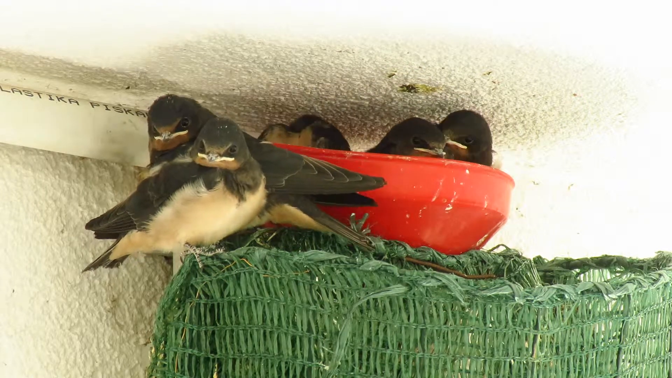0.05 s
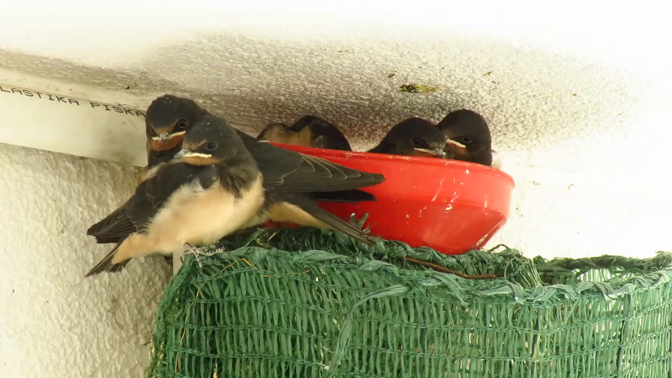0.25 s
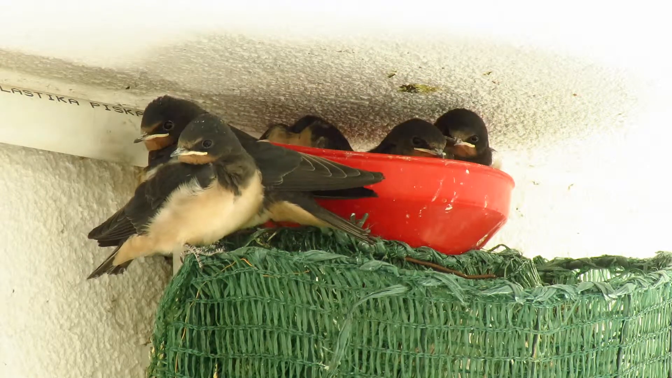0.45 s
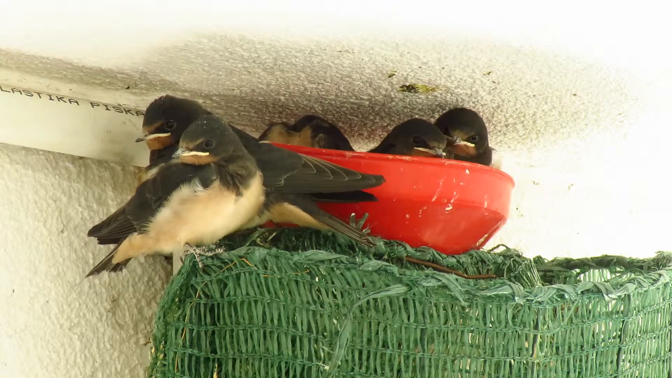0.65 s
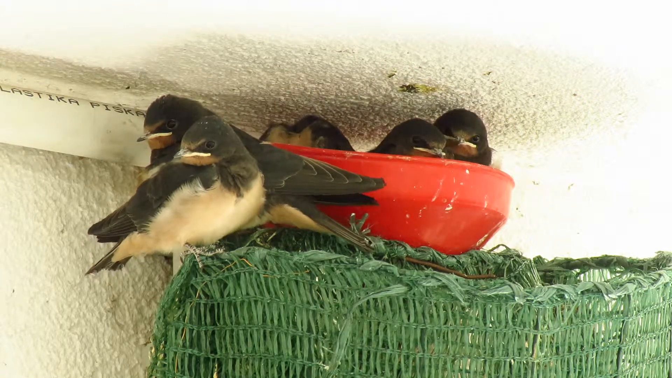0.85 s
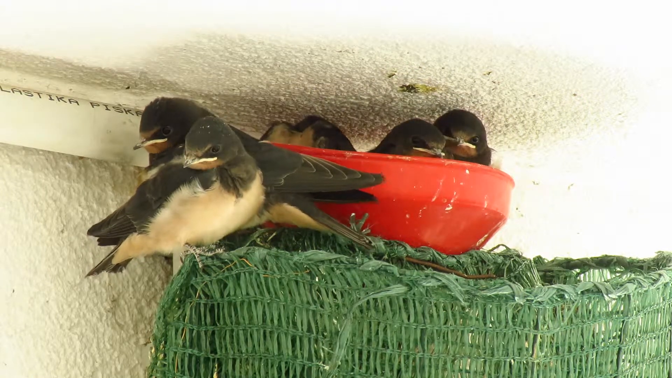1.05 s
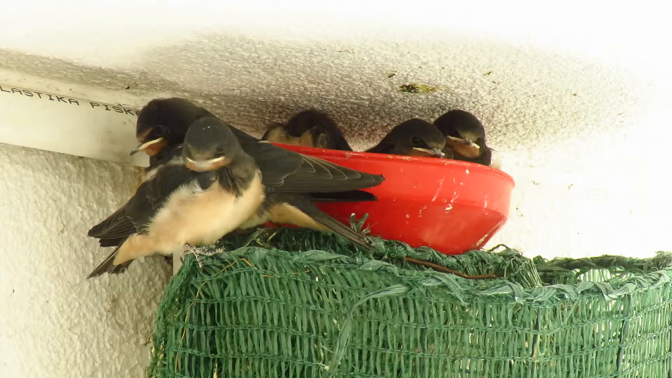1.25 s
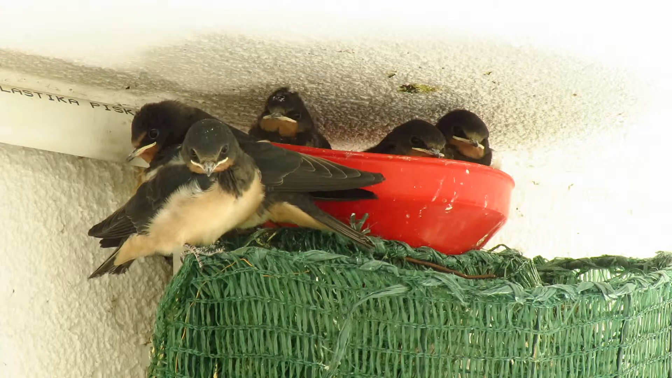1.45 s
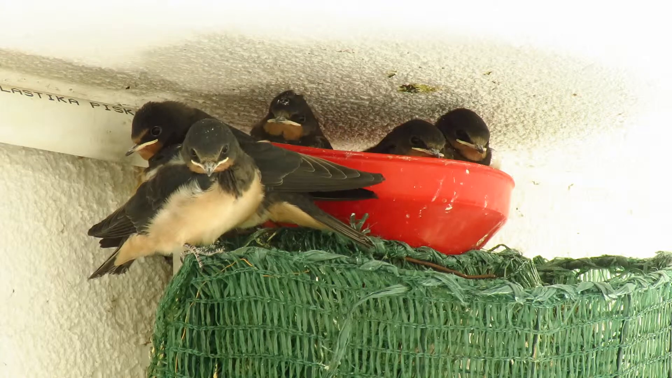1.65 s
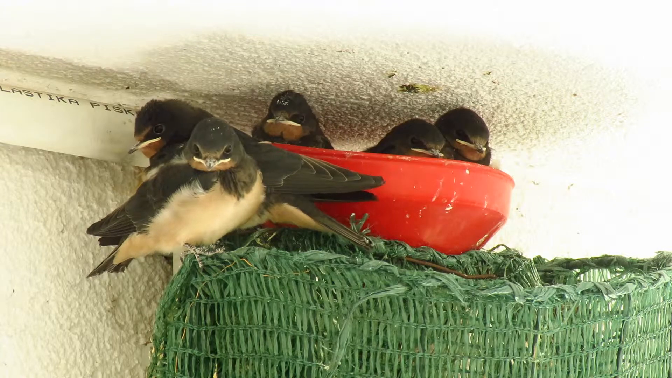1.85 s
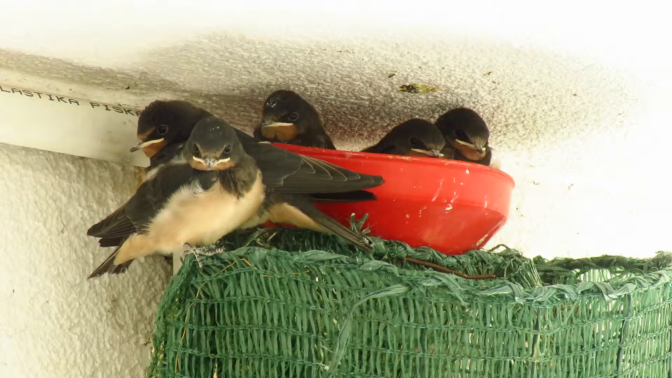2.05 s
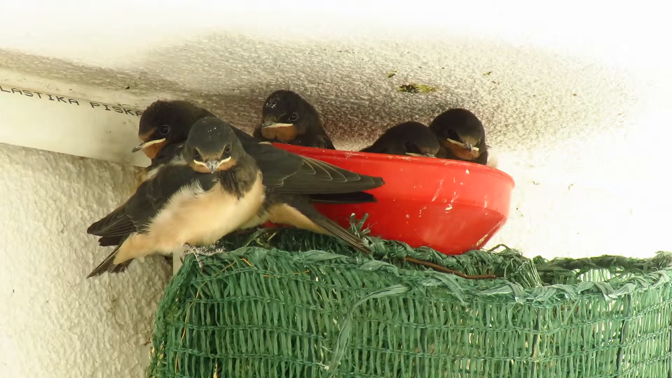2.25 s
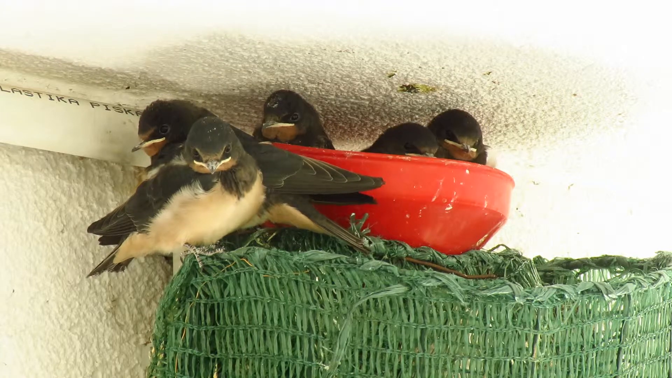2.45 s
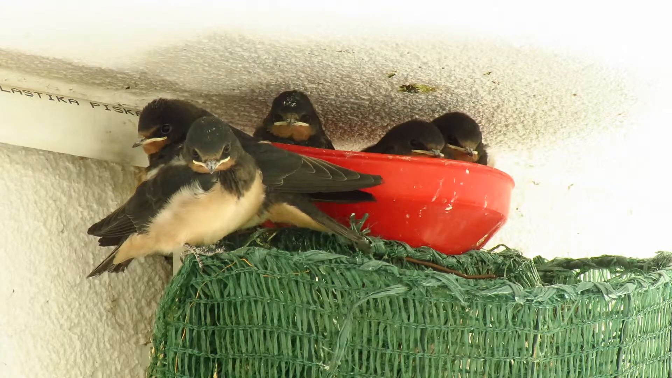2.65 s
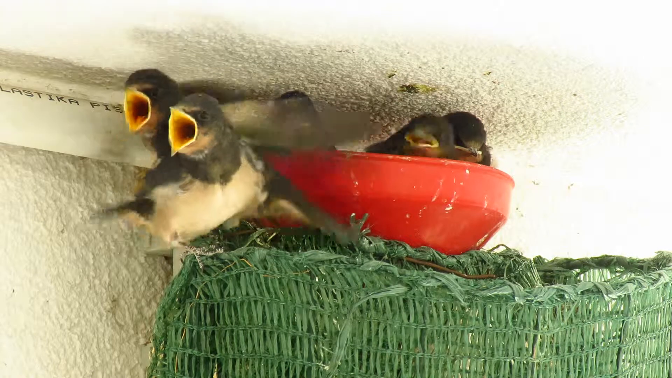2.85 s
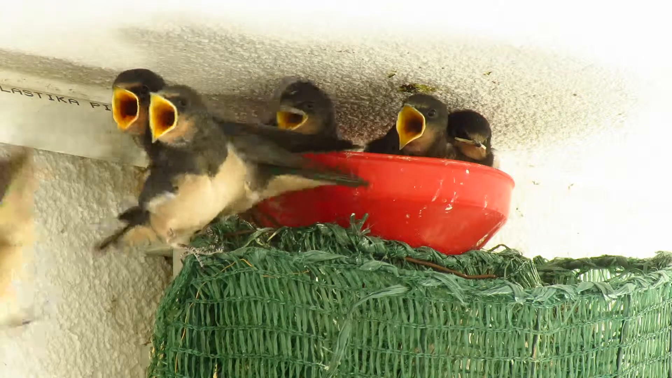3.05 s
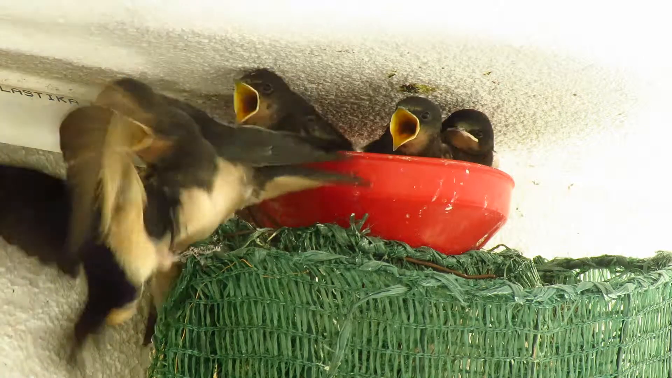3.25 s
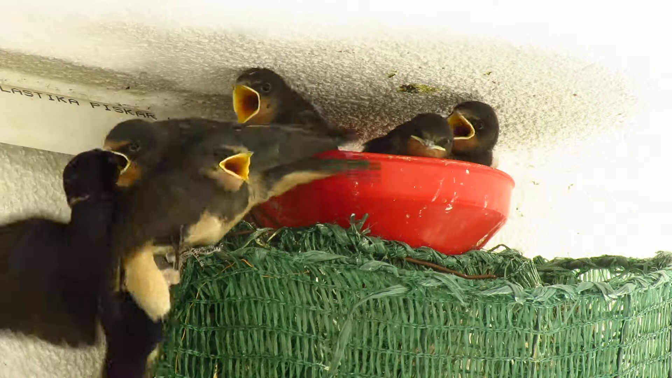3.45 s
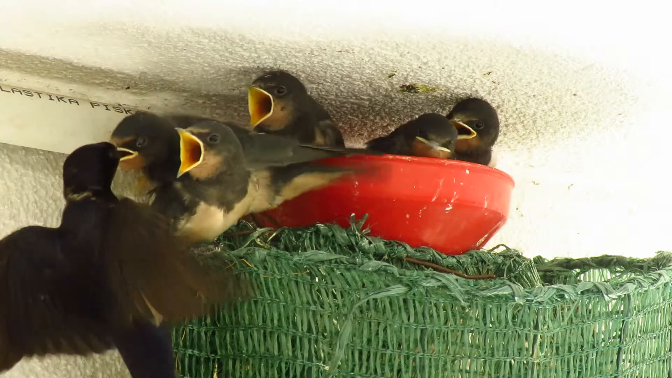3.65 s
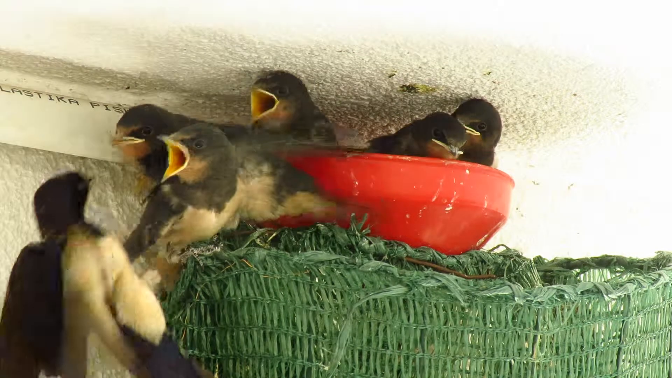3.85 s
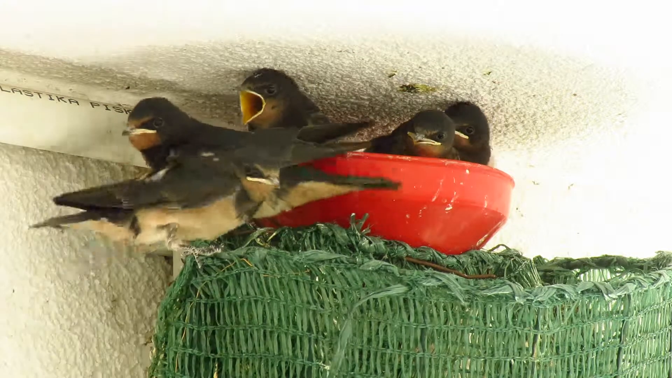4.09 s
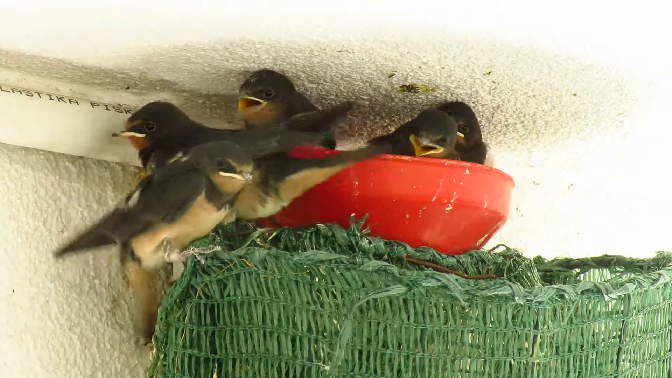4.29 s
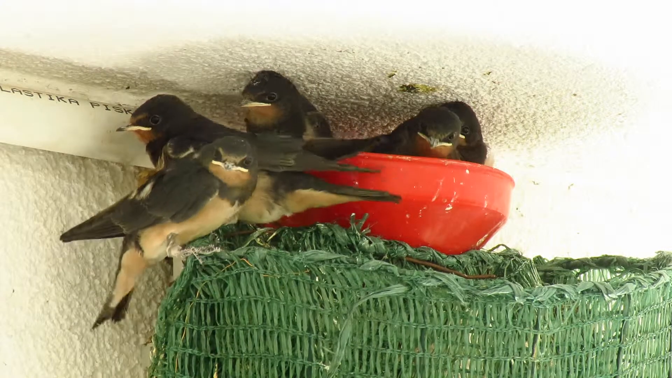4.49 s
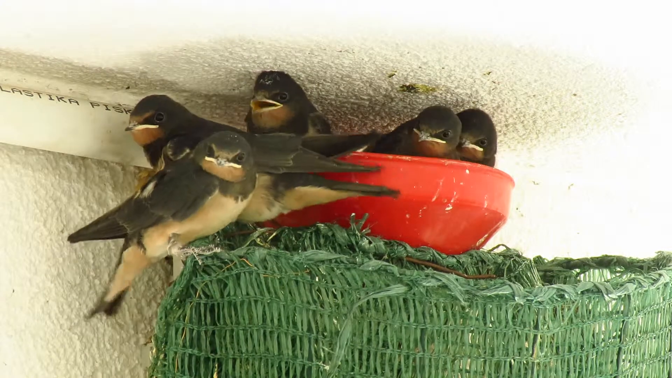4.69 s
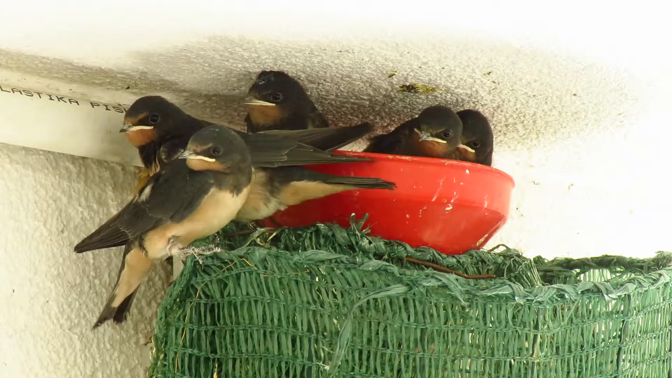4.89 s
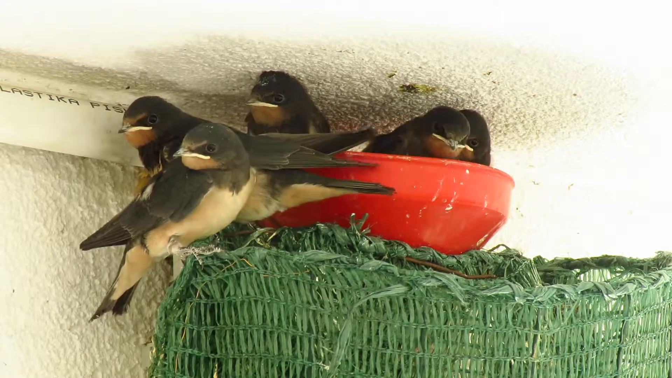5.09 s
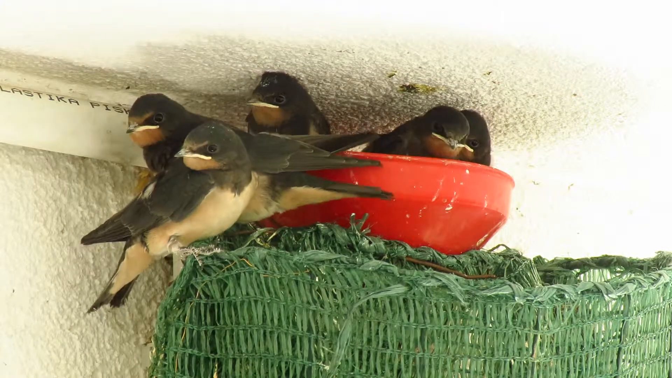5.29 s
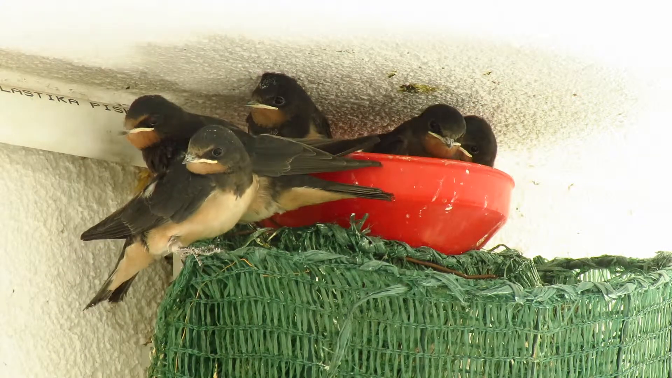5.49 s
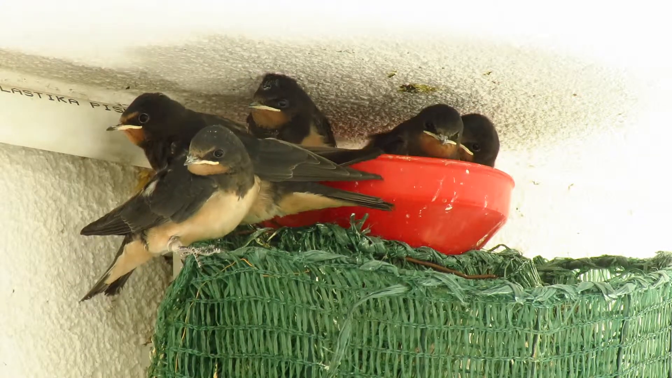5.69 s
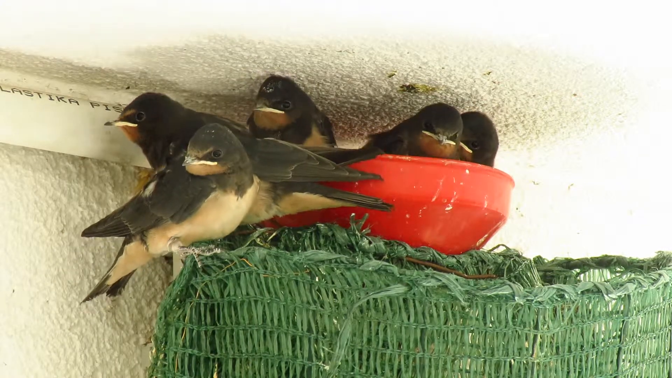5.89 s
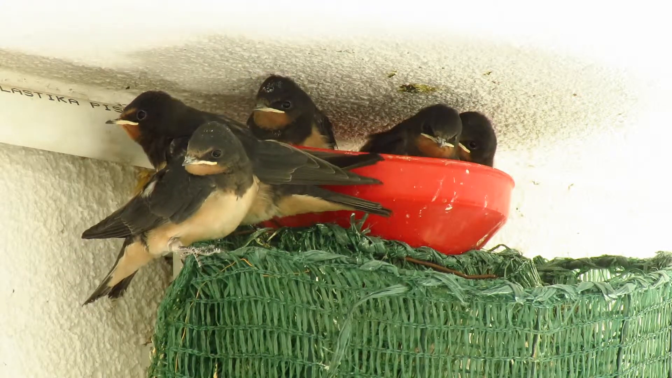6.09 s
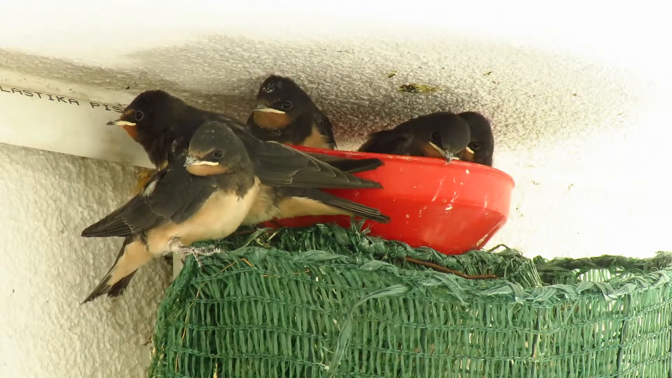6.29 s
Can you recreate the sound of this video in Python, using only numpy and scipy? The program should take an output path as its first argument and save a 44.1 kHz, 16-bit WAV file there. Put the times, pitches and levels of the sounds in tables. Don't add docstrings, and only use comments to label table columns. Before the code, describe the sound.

Small claws tick and scuff on plastic, then a sudden raspy chorus of rapid begging chirps bursts out, thinning to a few lone calls.

```python
import sys
import numpy as np
from scipy import signal
from scipy.fft import rfft, irfft, next_fast_len
from scipy.io import wavfile
from scipy.ndimage import uniform_filter1d, map_coordinates

SR = 44100
rng = np.random.default_rng(int(sys.argv[2]) if len(sys.argv) > 2 else 0)


def boost_factor(decibels):
    exponent = np.asarray(decibels, float) / 20
    return 10 ** exponent


def generate_wav(sig):
    pcm = np.round(np.clip(np.atleast_2d(sig).T, -1, 1) * 32767).astype(np.int16)
    wavfile.write(sys.argv[1], SR, pcm)


N = 279153
TIME = np.arange(N) / SR

# (start [s], loudest moment [s], rasp level [dB], upper throat band over it [dB], final pitch [Hz])
BEG_CALLS = [(2.882, 2.959, -24.5, 5, 2095), (2.999, 3.069, -24, 3.5, 2060), (3.11, 3.165, -21, 2.5, 1900),
             (3.169, 3.214, -23.5, 4.5, 2012), (3.223, 3.261, -23.5, 5, 1794), (3.264, 3.304, -25, 1, 1801),
             (3.307, 3.335, -24.5, -7, 1960), (3.351, 3.408, -23, 0, 1810), (3.446, 3.487, -26, -1, 1502),
             (3.485, 3.54, -24.5, 6, 1797), (3.587, 3.691, -23.5, 2.5, 1751),
             (3.757, 3.814, -25, 4.5, 1704), (3.871, 3.949, -24, 4.5, 1745), (4.018, 4.086, -27.5, 6, 1600),
             (4.171, 4.243, -26.5, 6, 1700), (4.289, 4.329, -24.5, 3, 1653), (4.342, 4.372, -28.5, 6, 1684),
             (4.388, 4.416, -28.5, 0.5, 1645), (4.687, 4.729, -31.5, -22, 1515),
             (4.758, 4.821, -28, 2.5, 1832), (4.888, 4.952, -28, -2, 1833), (5.815, 5.887, -30, -3.5, 1885),
             (6.217, 6.272, -34.5, -9.5, 1550)]


def unit(x):
    return x / np.sqrt(np.mean(x ** 2) + 1e-20)


def along(points, hz):
    f, v = np.transpose(points)
    return np.interp(np.log(hz + 1), np.log(f + 1), v)


def wobble(rate):
    return map_coordinates(rng.standard_normal(int(N * rate / SR) + 4), [TIME * rate])


def filtered(x, response):
    m = next_fast_len(N + SR // 2)
    return irfft(rfft(x, m) * response(np.fft.rfftfreq(m, 1 / SR)), m)[..., :N]


def banded(x, spectrum, gains, low_hz, high_hz):
    def above(hz, corner_hz):
        return 1 / (1 + (corner_hz / (hz + 1)) ** 6)

    shares = [
        lambda hz: above(hz, low_hz) * (1 - above(hz, high_hz)),
        lambda hz: above(hz, high_hz),
        lambda hz: 1 - above(hz, low_hz),
    ]
    out = 0
    for gain, share in zip(gains, shares):
        band = filtered(x, lambda hz: boost_factor(along(spectrum, hz)) * share(hz))
        out = out + gain * unit(band)
    return out


def swells(start, rise, fall, db, onset, bend, open_s=0.0019):
    out = np.zeros(N + SR)
    for s, up, down, level in np.broadcast(start, rise, fall, db):
        t = np.arange(round((up + down) * SR)) / SR
        rising = onset + (1 - onset) * (t / up) ** bend
        falling = np.abs(1 - (t - up) / down) ** bend
        shape = np.where(t < up, rising, falling)
        first = round(s * SR)
        span = slice(first, first + len(t))
        out[span] = np.maximum(out[span], boost_factor(level) * shape * np.minimum(t / open_s, 1))
    return out[:N]


def rush(spectrum, alike, patchy_db):
    z = signal.stft(rng.standard_normal((2, N)), nperseg=512)[2]
    field = uniform_filter1d(rng.standard_normal(z.shape[1:]), size=6, axis=0)
    field = uniform_filter1d(field, size=14, axis=1)
    pair = signal.istft(z * boost_factor(patchy_db * unit(field)), nperseg=512)[1][:, :N]

    def mid_side(hz):
        turn = np.arccos(np.clip(along(alike, hz), -1, 1)) / 2
        return boost_factor(along(spectrum, hz)) * [np.cos(turn), np.sin(turn)]

    mid, side = filtered(pair, mid_side)
    return unit(np.array([mid + side, mid - side]))


def outdoors():
    # (frequency [Hz], density [dB per Hz])
    town_spectrum = [(12, -64), (20, -23), (76, -5.5), (174, -4.5), (249, -4.5), (387, -2), (433, -5.5),
                     (889, -7), (2620, -21.5), (3180, -20.5), (11700, -41), (15000, -56)]
    # (frequency [Hz], likeness [-1 to 1])
    town_likeness = [(60, .99), (100, 0.9), (150, 0.56), (290, -0.32), (640, 0.37), (1410, 0.53),
                     (3100, 0.44), (6820, 0.38), (15000, -0.4)]
    # (frequency [Hz], density [dB per Hz])
    buffet_spectrum = [(20, -19), (60, 0.5), (140, 3.5), (260, -9), (600, -40.5)]
    # (start [s], rise [s], fall [s], buffet level [dB])
    gust_events = [
        (4.09, 0.03, 0.18, -39.5),
        (4.43, 0.065, 0.062, -40),
        (4.52, 0.044, .16, -39.5),
        (4.66, .12, 0.24, -42.5),
    ]
    gust = swells(*np.transpose(gust_events), onset=0, bend=0.69) * boost_factor(2.2 * wobble(15) - 3.5)
    town_level = boost_factor(-46 + 0.05 * wobble(2.66))
    town = town_level * rush(town_spectrum, town_likeness, patchy_db=2.0)
    return town + gust * rush(buffet_spectrum, [(30, 1.0), (200, 0.96)], patchy_db=2.5)


def porch(x):
    # (frequency [Hz], time to fall 60 dB [s])
    decay_s = [(800, 0.38), (3500, 0.31), (7000, 0.28), (14000, 0.22)]
    # (frequency [Hz], share [0 to 1])
    common_share = [(1500, 1), (4000, 0.44), (8000, .05)]
    out, hop, delay = np.zeros((2, N + SR)), SR // 4, 150
    for i in range(0, N, hop):
        hz, t, z = signal.stft(rng.standard_normal((2, SR // 2)), SR, nperseg=256)
        z = z + along(common_share, hz)[:, None] * z[::-1]
        decay = boost_factor(-60 * t / along(decay_s, hz)[:, None])
        tail = signal.istft(z * decay, SR, nperseg=256)[1]
        wet = signal.fftconvolve(x[None, i:i + hop], tail / np.linalg.norm(tail[0]), axes=1)
        out[:, i + delay:i + delay + wet.shape[1]] += wet
    return out[:, :N]


def paths(hz, echo_db):
    # (delay [s], level [dB], left lag [samples])
    early_echoes = [(.0006, -25.5, 3.5), (.0017, -26, 6), (.0031, -21.5, 2.5), (.0052, -17, -1.5),
                    (.0087, -17.5, 1), (.013, -16.5, -1.5), (.021, -21, 3)]
    side = np.array([[.5], [-.5]])
    direct_lag = side * 1.2 / (1 + (hz / 9000) ** 2) / SR
    out = np.exp(-2j * np.pi * hz * direct_lag)
    for s, db, lag in early_echoes:
        out = out + boost_factor(db + echo_db) * np.exp(-2j * np.pi * hz * (s + side * lag / SR))
    return out


def spread(pair):
    lag = 0.83 * wobble(30) / 2
    return np.array([map_coordinates(x, [np.arange(N) - side * lag]) for x, side in zip(pair, (1, -1))])


def scuffs():
    # (start [s], rise [s], fall [s], body level [dB], bright band over it [dB])
    scuff_events = [(0, 0.053, 0.07, -41.5, 1.5), (.12, 0.014, 0.15, -43, -3),
                    (0.343, 0.003, 0.049, -40.5, -3), (0.361, 0.014, 0.089, -30.5, -4.5),
                    (.42, 0.09, 0.073, -38.5, -2), (.562, 0.007, 0.12, -37, -7),
                    (.785, 0.0086, 0.032, -46.5, 1), (.948, .003, 0.069, -46, -3.5),
                    (1.014, .003, 0.057, -32.5, -9), (1.099, 0.0027, 0.058, -31.5, -9),
                    (1.13, 0.021, 0.15, -31.5, -8.5), (1.179, 0.037, 0.11, -35.5, -6.5),
                    (1.806, .003, 0.069, -43, -4), (1.909, 0.012, 0.097, -38.5, -6),
                    (2.2, 0.045, 0.077, -44, 2), (2.3, 0.081, 0.13, -51.5, 0),
                    (2.475, 0.0035, .03, -49, -5), (2.49, 0.0072, 0.077, -39.5, -1),
                    (2.551, 0.16, 0.089, -43, -3), (4.6, 0.047, 0.028, -47, -6)]
    # (frequency [Hz], density [dB per Hz])
    scrape_spectrum = [(180, -54), (300, -15), (559, -31), (726, -14), (991, -6.5), (1310, -2), (1730, -4),
                       (2140, -6), (4320, -5.5), (15000, -34)]
    lumps_db = 1.0 * wobble(55) + 5.4 * np.tanh(0.77 * wobble(350))
    rub = boost_factor(lumps_db) * rng.standard_normal(N)
    start, rise, fall, db, bright_db = np.transpose(scuff_events)
    low_db = -27
    gains = [swells(start, rise, fall, db + over_db, onset=0.077, bend=0.74)
             for over_db in (0, bright_db, low_db)]
    return boost_factor(-6.5) * banded(rub, scrape_spectrum, gains, low_hz=1000, high_hz=2550)


def knocks(events, cycles, crack):
    out, t = np.zeros(N + SR), np.arange(2000) / SR
    for s, db, hz in events:
        ring = np.sin(2 * np.pi * hz * t) * np.exp(-t * hz / cycles)
        snap = signal.lfilter([.4], [1, -1.1, .45], rng.standard_normal(len(t)))
        out[round(s * SR):][:len(t)] += boost_factor(db) * (ring + crack * snap * boost_factor(-60 * t / 0.04))
    return out[:N]


def footfalls():
    # (time [s], peak level [dB], ring frequency [Hz])
    claw_ticks = [(0.023, -36, 1250), (0.066, -30, 1230), (0.344, -38, 1220), (0.377, -28, 1180),
                  (0.37, -34, 770), (0.386, -26.5, 774), (0.394, -27, 1200), (0.408, -22, 1820),
                  (0.417, -31, 1090), (0.567, -24.5, 760), (0.595, -30, 560), (0.796, -32.5, 2520),
                  (0.952, -33.5, 1770), (0.987, -43, 1000), (1.017, -22.5, 1320), (1.024, -39, 1340),
                  (1.036, -40, 1370), (1.054, -25.5, 1320), (1.064, -35, 1330), (1.074, -28, 1340),
                  (1.146, -28, 1760), (1.17, -30, 1320), (1.81, -30.5, 1750), (1.946, -28.5, 1340),
                  (1.205, -41, 1400), (2.48, -28, 1200)]
    # (time [s], peak level [dB], frequency [Hz])
    foot_thuds = [(.568, -27, 330), (.576, -33, 170), (.59, -44, 200), (.61, -28, 337), (3.268, -25, 298),
                  (3.277, -25, 540), (3.315, -34, 250)]
    # (time [s], peak level [dB], frequency
    # [Hz])
    dry_clicks = [(.344, -35, 2600), (.374, -31, 4300), (.395, -25, 2920), (.568, -34, 3560),
                  (.596, -31, 2440), (.687, -38, 3000), (.889, -45, 1540), (1.192, -39, 1770),
                  (2.535, -38, 4000), (.385, -33, 5030), (.41, -29, 3480), (.987, -40, 5500),
                  (1.018, -27.5, 4040), (1.103, -30, 2780), (1.14, -31, 3000), (1.147, -33, 6600),
                  (1.148, -29, 2320), (3.46, -24, 11100), (1.809, -46, 3000), (1.948, -30, 3750),
                  (2.479, -49, 3000)]
    ticks = knocks(claw_ticks, cycles=4.0, crack=0.064)
    thuds = knocks(foot_thuds, cycles=0.89, crack=0.045)
    clicks = knocks(dry_clicks, cycles=5.0, crack=0.049)
    return ticks + thuds + clicks


RELEASE_S = 0.044


def per_call(first, last):
    start, top = np.transpose(BEG_CALLS)[:2]
    next_start = np.append(start[1:], N / SR)
    end = np.minimum(top + RELEASE_S, next_start - 100 / SR)
    return np.interp(TIME, np.ravel([start, end], "F"), np.ravel([first, last], "F"))


def effort():
    # (start [s], rise [s], fall [s], level [dB], upper, lowest band over it [dB])
    gap_filling = (3, 0.3, 1.2332, -32, 4, -0.5)
    start, top, db, high_db, _ = np.transpose(BEG_CALLS)
    rise, open_s = top - start, 0.011
    calls = [
        swells(start, rise, RELEASE_S, db, 0.33, 1, open_s),
        swells(start, rise, RELEASE_S, db + high_db, 0.11, 1, open_s),
        swells(start, rise, 0.034, db - 8, 0.78, 0.59, open_s),
    ]
    gains = []
    for call, over_db in zip(calls, (0, *gap_filling[4:])):
        bed = swells(*gap_filling[:3], gap_filling[3] + over_db, 0.27, 0.86, open_s)
        gains.append(np.maximum(call, bed))
    return gains


def hiss():
    # (frequency [Hz], density [dB per Hz])
    air_spectrum = [(6000, -40), (9000, 0), (10500, 1), (13000, -15), (15500, -22)]
    # (time [s], hiss over the upper band [dB])
    gape_levels = [(2.89, -25), (2.96, -18), (3.08, -24), (3.19, -28), (3.3, -44), (3.38, -28),
                   (3.452, -33), (3.462, -9.5), (3.52, -24), (3.63, -28), (3.655, -15), (3.7, -28),
                   (3.8, -17.5), (3.97, -26), (4.1, -25), (4.25, -29), (4.5, -28), (6.3, -30)]
    air = boost_factor(7.7 * np.tanh(wobble(230))) * rng.standard_normal(N)
    air = filtered(air, lambda hz: boost_factor(along(air_spectrum, hz)))
    _, high, low = effort()
    gape = boost_factor(np.interp(TIME, *np.transpose(gape_levels)))
    return gape * (0.43 * high + 1.25 * low) * unit(air)


def climbing_stacks():
    # (time [s], start pitch [Hz], end pitch [Hz], level [dB], beak resonance [Hz])
    quick_climbs = [(2.936, 1480, 2134, -20, 5500), (3.049, 1460, 2046, -21.5, 5830),
                    (3.154, 1430, 1810, -19.5, 6900), (3.188, 1460, 2007, -23, 6484),
                    (3.274, 1604, 1804, -25.5, 7160), (3.317, 1392, 2036, -36, 8980),
                    (3.393, 1330, 1710, -30, 5330), (3.532, 1333, 1750, -28.5, 4498),
                    (3.67, 1320, 1765, -27, 6600), (3.807, 1474, 1736, -26, 6480),
                    (3.936, 1486, 1700, -26.5, 6280), (4.072, 1886, 2280, -27, 7510),
                    (4.247, 1542, 1810, -29, 5090), (4.408, 1485, 1579, -25.5, 5670),
                    (6.262, 1497, 1566, -37.5, 4580)]
    slow_climbs = [(4.21, 1365, 1633, -24, 6400), (4.689, 1295, 1435, -40, 4000),
                   (4.797, 1530, 1837, -31, 7450), (4.935, 1480, 1834, -31, 6800),
                   (5.853, 1375, 1850, -22.5, 7900)]
    styles = [(quick_climbs, .03, 1.293, 1.25), (slow_climbs, .044, 0.853, 1.5)]
    return [(s, length, k * a, k * b, db, beak_hz, bend, peak)
            for rows, length, bend, peak in styles
            for s, a, b, db, beak_hz in rows
            for k in range(2, 5)]


def held_overtones():
    # (time [s], length [s], frequency [Hz], level [dB])
    single_holds = [(2.963, 0.021, 5910, -19), (3.021, 0.051, 2953, -25.5), (5.873, 0.054, 5460, -39),
                    (3.176, 0.028, 2950, -24.5), (3.24, 0.03, 4915, -29), (3.293, 0.069, 3116, -29),
                    (3.362, 0.026, 3232, -27), (3.396, 0.028, 5400, -26.5), (3.4, 0.022, 6740, -29),
                    (3.5, 0.034, 4930, -26.5), (3.607, 0.02, 4970, -25.5), (3.953, 0.022, 3220, -26.5),
                    (3.949, 0.018, 6640, -24.5), (4.063, 0.037, 5850, -29), (4.076, 0.04, 6260, -26),
                    (4.254, 0.063, 3900, -30.5), (4.324, .018, 3030, -27), (4.326, 0.03, 4960, -22.5),
                    (4.349, 0.035, 6360, -30), (4.366, 0.023, 5470, -26), (4.414, .036, 4930, -33),
                    (4.423, 0.027, 6360, -30), (5.866, 0.016, 4710, -23), (6.257, 0.014, 2567, -36),
                    (6.25, 0.013, 4000, -38), (6.256, .012, 5000, -37), (5.82, 0.03, 4343, -41),
                    (6.267, 0.019, 1538, -31.5), (.008, 0.019, 3820, -46)]
    # (delay [s], length [s], frequency [Hz], level [dB])
    warble_tones = [(0, 0.0425, 4920, -27.5), (0.026, 0.0365, 4320, -28), (0.038, .036, 5400, -25)]
    # (time [s], delay stretch, pitch ratio, level [dB], tiring [dB per 0.05 s])
    lone_calls = [(4.751, 1.15, 0.98, -4, -4), (4.899, 0.82, 0.96, -1, 1)]
    held = [(*row, 0.023) for row in single_holds]
    for s, stretch, ratio, call_db, tire_db in lone_calls:
        for delay, length, hz, db in warble_tones:
            level_db = db + call_db - tire_db * delay * 20
            held.append((s + delay * stretch, length, hz * ratio, level_db, 0.047))
    return [(s, length, hz * (1 - rise / 2), hz * (1 + rise / 2), db, 0, 1, 1.25)
            for s, length, hz, db, rise in held]


def chirps():
    # (time [s], length [s], start frequency [Hz], end
    # frequency [Hz], level [dB])
    short_glides = [(2.92, 0.02, 6110, 6260, -32), (2.944, 0.021, 6930, 7040, -23.5),
                    (2.947, 0.02, 5640, 5723, -25), (3.001, 0.033, 2840, 3050, -32),
                    (3.049, 0.016, 3140, 3250, -21), (3.064, 0.025, 5610, 5660, -25),
                    (3.068, 0.021, 7225, 6970, -26), (3.069, 0.018, 4940, 4921, -29),
                    (3.076, 0.021, 4050, 4164, -36), (3.123, 0.055, 6400, 6060, -35),
                    (3.154, 0.021, 4880, 4950, -28), (3.159, 0.018, 6674, 6760, -20.5),
                    (3.191, 0.023, 6569, 6500, -35), (3.193, 0.019, 5097, 5473, -30),
                    (3.198, 0.016, 3680, 4050, -24), (3.207, 0.019, 5570, 5340, -32),
                    (3.209, 0.029, 3330, 3280, -26.5), (3.226, 0.034, 2580, 2540, -33),
                    (3.236, 0.018, 3900, 3815, -31), (3.245, 0.017, 2990, 2931, -30),
                    (3.251, 0.021, 3650, 3903, -33), (3.269, 0.027, 4300, 4460, -32),
                    (3.282, 0.019, 6600, 6730, -24), (3.286, 0.028, 3046, 3004, -27.5),
                    (3.315, 0.039, 5230, 5393, -36), (3.325, 0.023, 3714, 3790, -23.5),
                    (3.369, 0.028, 5253, 5251, -34), (3.373, 0.023, 3740, 3823, -38),
                    (3.384, 0.019, 4673, 4742, -27), (3.388, 0.028, 2627, 3100, -30),
                    (3.392, 0.05, 5300, 5430, -43), (3.41, 0.027, 3420, 3550, -32),
                    (3.528, 0.032, 4854, 4638, -38), (3.524, 0.016, 6360, 6350, -29.5),
                    (3.545, 0.026, 3470, 3490, -31.5), (3.606, 0.026, 3120, 3166, -30.5),
                    (3.654, 0.022, 4693, 5200, -31), (3.674, 0.017, 2960, 3095, -26),
                    (3.704, 0.024, 3953, 4034, -30), (3.713, 0.018, 4429, 4600, -30),
                   (3.763, 0.02, 4692, 4703, -32), (3.791, 0.022, 4981, 4806, -29),
                   (3.797, 0.053, 3110, 3050, -31), (3.834, 0.019, 3812, 3790, -31),
                   (3.903, 0.022, 3840, 4250, -28), (3.917, 0.032, 6200, 6170, -30),
                   (3.943, 0.031, 5300, 5530, -27.5), (4.028, 0.022, 4691, 4897, -32),
                   (4.066, 0.055, 3067, 3207, -29.5), (4.074, 0.017, 3832, 3915, -31),
                   (4.091, 0.015, 5430, 5260, -27), (4.119, 0.045, 6260, 6430, -40),
                   (4.184, 0.039, 2817, 2669, -36), (4.221, 0.019, 4200, 4400, -34),
                   (4.225, 0.023, 2390, 2454, -27.5), (4.23, 0.013, 5200, 5490, -21),
                   (4.245, 0.032, 6550, 6566, -35), (4.271, 0.019, 5469, 5523, -31),
                   (4.327, 0.07, 6370, 6333, -30), (4.365, 0.04, 3090, 3205, -33),
                   (4.386, 0.02, 2930, 2945, -32), (4.394, 0.063, 4850, 5030, -34.5),
                   (4.774, 0.038, 5860, 5860, -34), (4.792, 0.035, 3170, 3064, -31),
                   (4.8, 0.028, 6257, 6370, -28.5), (4.808, 0.039, 5430, 5480, -21),
                   (4.813, 0.018, 4543, 4633, -29), (4.898, 0.06, 4710, 4930, -41),
                   (4.931, 0.024, 4310, 4404, -30.5), (4.94, 0.036, 5400, 5400, -24.5),
                   (4.952, 0.018, 3220, 3225, -27.5), (5.84, 0.024, 4217, 4246, -31),
                   (5.847, 0.03, 5220, 5250, -29), (5.88, 0.028, 3540, 3550, -25.5),
                    (4.76, 0.042, 4250, 4350, -37), (4.775, 0.0301, 2800, 3300, -34),
                  (4.815, 0.027, 3200, 3250, -27.5), (4.815, 0.021, 3550, 3680, -25.5),
                  (3.93, 0.0214, 4300, 3100, -25.5), (4.04, 0.017, 1900, 5400, -28.5),
                  (2.885, .02, 4900, 4000, -45), (4.82, .02, 5300, 4100, -38),
                  (4.815, 0.01806, 6600, 7300, -27.5), (4.905, 0.027, 4100, 3800, -32),
                  (4.915, 0.023, 3700, 4900, -37), (4.955, 0.01495, 6400, 7200, -36),
                  (4.945, 0.024, 3700, 6100, -34), (5.816, 0.036, 5350, 5300, -34),
                  (5.818, 0.049, 4400, 4800, -32), (5.83, .03, 2800, 2900, -38),
                  (5.905, 0.077, 3730, 3700, -42), (4.718, 0.033, 2950, 3150, -38.5),
                  (4.72, 0.02405, 3900, 4550, -34), (5.893, 0.017, 3200, 3150, -29.5),
                  (5.885, 0.0163, 3300, 3800, -25), (6.222, 0.047, 3050, 2700, -40),
                  (6.222, 0.034, 4600, 4500, -43), (6.266, 0.013, 3800, 4700, -34),
                  (6.267, .026, 3080, 2300, -30), (2.938, 0.019, 3300, 4100, -27),
                  (3.9, 0.0098, 3200, 3050, -36), (4.232, 0.016, 6100, 5100, -30),
                  (4.7, 0.019, 5400, 6400, -32)]
    return [(*row, 0, 1, 1.25) for row in short_glides]


def clear():
    # (frequency [Hz], gain [dB])
    mouth_gain = [(1500, 2), (2700, -5), (4200, 1.5), (4800, -15.5), (9000, -15)]
    out, shake, flutter = np.zeros(N + SR), wobble(250), wobble(420)
    for s, length, start_hz, end_hz, db, beak_hz, bend, peak in climbing_stacks() + held_overtones() + chirps():
        i, u = round(s * SR), np.linspace(0, 1, round(length * SR))
        span = slice(i, i + len(u))
        glide = 1 - (1 - u) ** bend
        hz = (start_hz + (end_hz - start_hz) * glide) * (1 + .013 * shake[span])
        tract = 1
        if beak_hz:
            beak = boost_factor(0.5) * np.exp(-((hz - beak_hz) / 430) ** 2)
            tract = boost_factor(along(mouth_gain, hz)) + beak
        level = boost_factor(db + 1 + 4 * np.tanh(flutter[span]))
        swell = tract * level * np.sin(np.pi * u ** peak) ** .6
        out[span] += swell * np.sin(2 * np.pi * np.cumsum(hz) / SR)
    return out[:N]


def syrinx(pitch, jitter, flutter_db):
    phase = 2 * np.pi * np.cumsum(pitch * (1 + jitter * wobble(400))) / SR
    flutter = boost_factor(1.2 * flutter_db * np.tanh(wobble(260)))
    overtones = sum(np.sin(k * phase + k * k) for k in range(2, 11))
    return flutter * (.15 * np.sin(phase) + overtones)


def rasp():
    # (frequency [Hz], density [dB per Hz])
    throat_spectrum = [(600, -10), (900, -9.5), (1400, -1), (2150, -5.5), (3000, -3.5), (4500, -2.5),
                       (6800, -6), (8800, -16.5), (11000, -30), (15500, -47)]
    # (time [s], level [dB])
    mate_levels = [(2.9, -1.5), (3.6, 1), (4.4, -2), (4.7, -10.5), (5.0, -1.5), (6.3, -8)]
    end_hz, start_hz = np.transpose(BEG_CALLS)[-1], 1320
    progress = per_call(0 * end_hz, end_hz ** 0)
    climb = np.interp(progress, [0, .35, .8, 1], [0.0014, .15, 0.98, 1])
    pitch = start_hz + climb * per_call(end_hz - start_hz, end_hz - start_hz)
    lead = syrinx(pitch, jitter=.055 - .04 * climb, flutter_db=3.5)
    mates = sum(syrinx(pitch * (ratio + .07 * wobble(30)), jitter=.07, flutter_db=3.5)
                for ratio in (.77, .9, 1.17))
    share = boost_factor(np.interp(TIME, *np.transpose(mate_levels)))
    breath = .4 * boost_factor(3 * wobble(260)) * rng.standard_normal(N)
    voices = (lead + share * mates) / np.sqrt(1 + 3 * share ** 2) + breath
    return boost_factor(-7.0) * banded(voices, throat_spectrum, effort(), low_hz=2060, high_hz=4400)


def scene():
    rough = rasp() + hiss() + scuffs() + footfalls()
    rough = filtered(rough, lambda hz: 1 / (1 + (110 / (hz + 1)) ** 4))
    clear_tones = clear()
    near = filtered(rough, lambda hz: paths(hz, echo_db=0))
    near = near + filtered(clear_tones, lambda hz: paths(hz, echo_db=-5))
    far = boost_factor(-10.5) * porch(rough + clear_tones) + outdoors()
    return boost_factor([[-2.2], [-1.5]]) * spread(near) + far


def roll_off(x):
    return signal.sosfilt(signal.butter(12, 15690, fs=SR, output="sos"), x)


def record(dry):
    mix = filtered(dry, lambda hz: hz < 15600)
    return roll_off(mix)


dry = scene()
out = record(dry)
generate_wav(out)
```